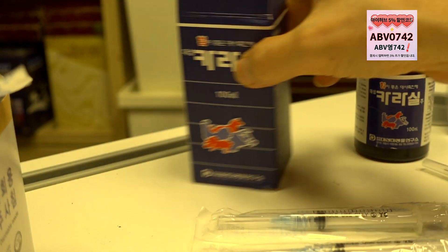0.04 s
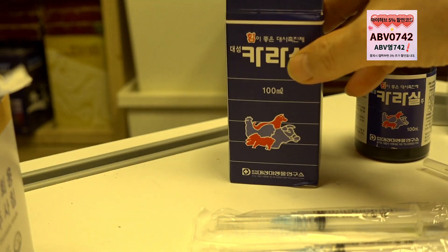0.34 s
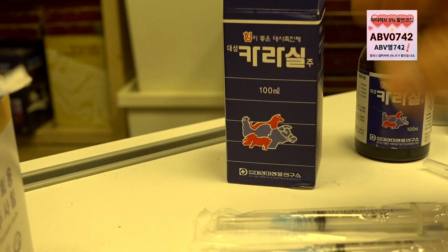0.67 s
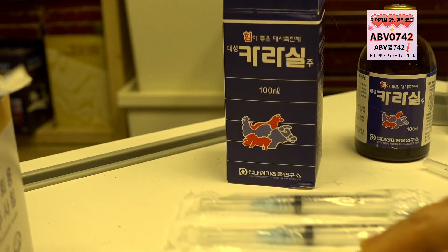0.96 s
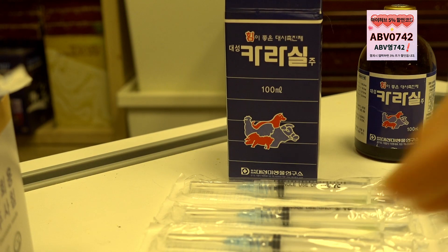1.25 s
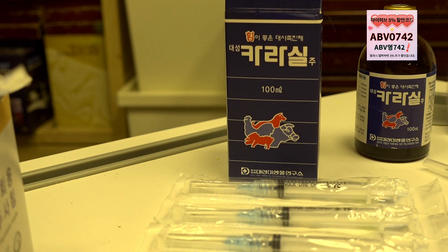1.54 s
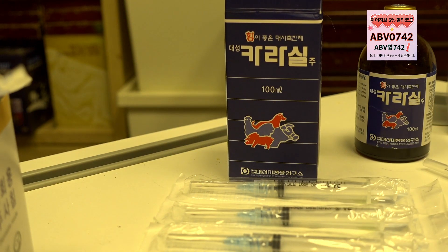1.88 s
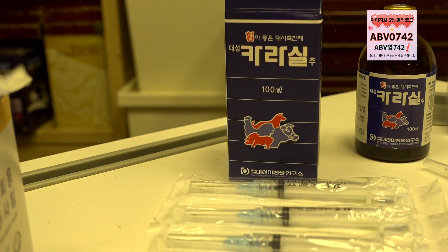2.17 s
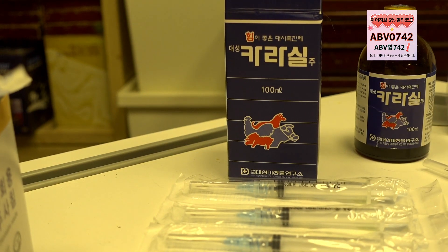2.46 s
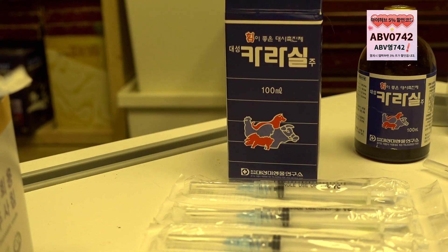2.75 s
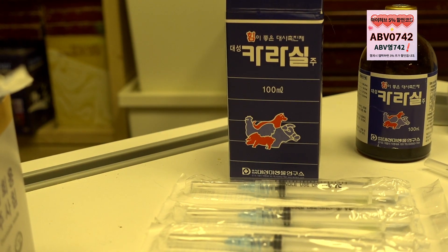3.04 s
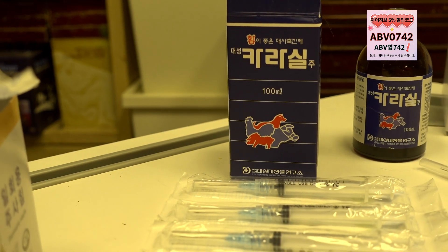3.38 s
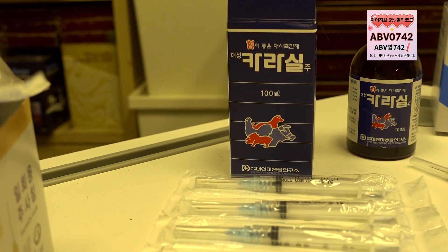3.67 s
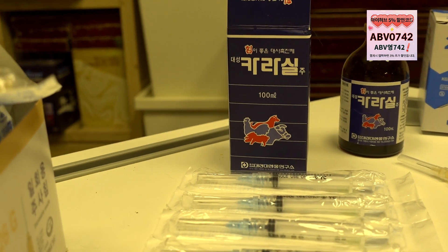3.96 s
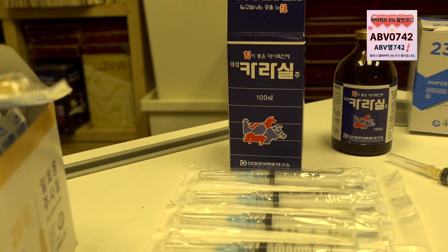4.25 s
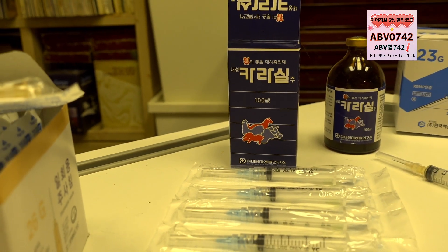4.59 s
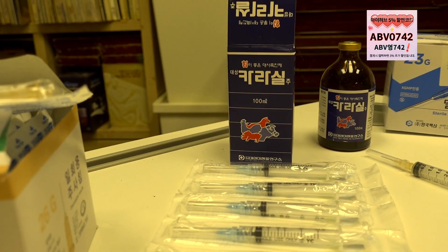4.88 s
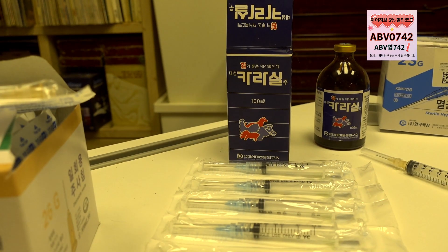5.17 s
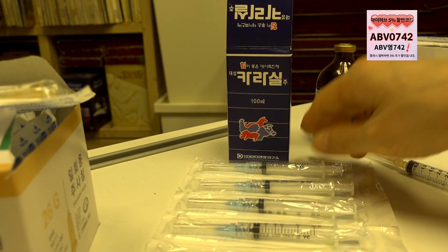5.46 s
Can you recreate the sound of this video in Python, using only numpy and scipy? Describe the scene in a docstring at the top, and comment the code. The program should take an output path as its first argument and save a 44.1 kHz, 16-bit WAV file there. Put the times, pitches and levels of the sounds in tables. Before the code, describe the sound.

In a small, slightly echoing room with a faint hum, a box slides and knocks lightly on a table close by. Crisp crinkling and soft bumps follow as plastic packs are put down, and the creased wrapping keeps ticking. A hand swishes softly past, a camera's zoom motor whispers and its lever clicks back. Finally a hand grabs the packs, making them crackle sharply.

```python
"""In a small, fairly live room with a faint hum, a cardboard box slides over a table and rocks onto
its base. Plastic syringe packs are laid down in front of it: they rub, bump the table, and their
creases snap. The creased film goes on ticking as it relaxes, and a nearby camera's focus motor sings
faintly now and then. A hand brushes by, the zoom motor whispers, and the zoom lever clicks back.
Last, a hand grabs the packs again."""
import sys
import numpy as np
from scipy import signal
from scipy.io import wavfile
from scipy.ndimage import uniform_filter1d

SR = 44100
rng = np.random.default_rng(int(sys.argv[2]) if len(sys.argv) > 2 else 0)


def master_out(mix):
    """Clip the mix to full scale and print it as 16-bit PCM to the path in sys.argv[1]."""
    frames = np.transpose(np.atleast_2d(mix))
    ceiling = np.clip(frames, -1, 1)
    pcm = np.round(ceiling * 32767).astype(np.int16)
    wavfile.write(sys.argv[1], SR, pcm)


N = 252430
TIME = np.arange(N) / SR
TREBLE_LIMIT_HZ = 16100
# the pitches at which the table top rings: f/Hz, width/Hz, level/dB
TABLE_MODES = [(200, 61, -38), (313, 52, 0), (526, 500, 2.5), (760, 410, 2)]


def amp(db):
    """Turns decibels into a factor to multiply by."""
    return 10 ** (np.asarray(db) / 20)


def unit_rms(x):
    """Scales a sound to an average strength (rms) of 1."""
    return x / np.sqrt(np.mean(x ** 2) + 1e-20)


def unit_energy(x):
    """Scales a sound to a total energy of 1."""
    return x / np.sqrt(np.sum(x ** 2) + 1e-20)


def value_at(points, hz):
    """Looks up a curve at hz, on a log frequency axis."""
    f, value = np.transpose(points)
    return np.interp(np.log(hz + 1), np.log(f + 1), value)


def add(mix, s, sound):
    """Mixes a sound in at s seconds."""
    part = mix[..., max(round(s * SR), 0):][..., :sound.shape[-1]]
    part += sound[..., :part.shape[-1]]


def swell(start, length, rise_s, fall_s):
    """A loudness curve: rises smoothly, holds until the length is over, then dies away."""
    age = TIME - start
    rise = np.sin(np.pi / 2 * np.clip(age / rise_s, 0, 1)) ** 2
    return rise * np.exp(-np.maximum(age - length, 0) / fall_s)


def click_of(spectrum, size=2048):
    """A click with the given spectrum, which also serves as a filter."""
    hz = abs(np.fft.fftfreq(size, 1 / SR))
    log_gain = np.log(amp(value_at(spectrum, hz)))
    bins = np.exp(np.conj(signal.hilbert(log_gain)))  # packs the energy at the start
    return np.fft.ifft(bins).real[:size // 2]


def colour(x, spectrum):
    """Filters a stereo sound by a spectrum, at rms 1."""
    return unit_rms(signal.oaconvolve(x, click_of(spectrum)[None], axes=1)[:, :N])


def resonate(x, modes):
    """Lets a sound ring several resonances (modes) side by side, at rms 1."""
    return unit_rms(sum(amp(db) * signal.lfilter(*signal.iirpeak(hz, hz / width, SR), x)
                        for hz, width, db in modes))


def noise(side_db):
    """Stereo noise; the lower side_db, the more alike left and right are."""
    mid, side = rng.standard_normal((2, N))
    return unit_rms(np.array([mid + amp(side_db) * side, mid - amp(side_db) * side]))


def murmur(modes, side_db):
    """Noise filtered twice, so that it stays close to a few resonances."""
    wider = [(hz, 2 * width, 0) for hz, width, db in modes]
    return resonate(resonate(noise(side_db), modes), wider)


def background(hiss_db=-5):
    """Murky room tone with a little hiss, and a hollow hum that comes and goes."""
    # spectra of the murk and the hiss: f/Hz, level/dB
    murk = [(25, -19), (60, -16.5), (120, -4.5), (220, 0), (420, -2.5), (600, -1.5), (790, 2.5),
            (1050, -4.5), (1500, -3), (2300, -5), (4000, -16), (8000, -33.5)]
    hiss = [(1000, -22), (2400, -4.5), (3800, 3.5), (6500, -1.5), (10000, -2.5), (13500, -3), (16000, -4)]
    # loudness of the room tone: t/s, level/dB
    tone_levels = [(0, -58), (.7, -64), (2.4, -62), (3.3, -65), (4.4, -67), (5.5, -63.5)]
    # swells of the hum: start/s, length/s, level/dB
    hum_swells = [(-.2, 0.46, -59), (1.7, 0.65, -63), (2.803, 0.29, -70.5), (4.54, 0.87, -74)]
    # its resonances: f/Hz, width/Hz, level/dB
    hum_modes = [(824, 167, -1.5), (1390, 420, -14), (2226, 220, -13)]
    air = colour(noise(side_db=0.5), murk) + amp(hiss_db) * colour(noise(side_db=-2.0), hiss)
    air_gain = amp(np.interp(TIME, *np.transpose(tone_levels)))
    hum_gain = sum(amp(db) * swell(start, length, rise_s=0.19, fall_s=0.21)
                   for start, length, db in hum_swells)
    return air_gain * air + hum_gain * murmur(hum_modes, side_db=-5.0)


def friction(spread_db, slips_per_s=3400, smooth_db=-5.0):
    """Countless tiny slips and buckles of uneven size over smooth rubbing."""
    sizes = amp(spread_db * np.minimum(rng.exponential(1, N), 4))
    slipping = rng.random(N) < slips_per_s / SR
    slips = unit_rms(sizes * slipping * rng.choice([-1, 1], N))
    return slips + amp(smooth_db) * noise(side_db=-11)


def slide(moves, modes, spread_db, rise_share=0.26):
    """Sliding surfaces rub and fizz, and their push makes the box or table ring."""
    # spectra of the rub and its bright fizz: f/Hz, level/dB
    rub_spectrum = [(80, -65), (400, -33.5), (800, -13.5), (1200, -7), (1600, -2.5), (2050, -5.5),
                    (2700, -4.5), (3600, -0.5), (4500, -1.5), (5800, -4), (7500, -24)]
    fizz_spectrum = [(300, -49), (4000, -18.5), (6200, 11), (8500, 0.5), (11000, -4.5), (14000, -11.5),
                     (16000, -24)]
    # each move gathers speed, holds and dies away
    rub, fizz, push = sum(amp(levels)[:, None] * swell(start, length, rise_share * length, fall_s=0.019)
                          for start, length, *levels in moves)
    slips = friction(spread_db)
    surface = rub * colour(slips, rub_spectrum) + fizz * colour(slips, fizz_spectrum)
    return surface + push * murmur(modes, side_db=-20.5)


def box_slides():
    """The hollow cardboard box scrapes over the table."""
    # its moves: start/s, length/s, rub/dB, fizz/dB, push on the box/dB
    moves = [(-.015, 0.051, -42, -44.5, -47.5), (.045, 0.059, -45, -50, -44.5)]
    # its resonances: f/Hz, width/Hz, level/dB
    modes = [(828, 108, 7), (923, 33, -14), (396, 150, -9)]
    return slide(moves, modes, spread_db=4.0)


def knocks(blows, modes, contact_s, left_db, left_lag_s=0):
    """Blows make an object ring; a longer contact softens the start."""
    t = np.arange(4096) / SR
    ring = sum(amp(db - 60 * t / t60) * np.sin(2 * np.pi * hz * t) for hz, db, t60 in modes)
    ring = unit_energy(ring * (1 - np.exp(-t / contact_s)))
    out = np.zeros((2, N))
    for s, db in blows:
        add(out[0], s + left_lag_s, amp(db + left_db) * ring)
        add(out[1], s, amp(db) * ring)
    return out


def box_rocks():
    """The box rocks onto its base with four ever softer knocks."""
    # the knocks: t/s, energy/dB
    blows = [(.1853, -19.5), (.2085, -25), (.2515, -27), (.267, -29)]
    # the cardboard's ring: f/Hz, level/dB, time to fade by 60 dB/s
    modes = [(327, 0.5, 0.023), (478, -2.5, 0.026), (866, 4, 0.022), (964, -4, 0.01), (1420, -11, 0.033)]
    return knocks(blows, modes, contact_s=0.0023, left_db=1.5)


def ping(hz, decay_s, size=512):
    """A very short tone that swells for a moment and dies."""
    t = np.arange(size) / SR
    envelope = t * np.exp(-t / decay_s)
    wave = np.sin(2 * np.pi * hz * t)
    return envelope * (wave - np.average(wave, weights=envelope))  # the pressure sums to zero


def film_ring(hz, decay_s, overtone_ratio=1.41, overtone_db=-9):
    """The plastic film rings with a main tone and a higher one that dies sooner."""
    return ping(hz, decay_s) + amp(overtone_db) * ping(overtone_ratio * hz, 0.65 * decay_s)


def crack(energy_db, soft_edge_hz=9500, soft_db=-28, db_per_octave=24, size=512):
    """The treble of a snap: the harder the crease flips, the higher it reaches."""
    # spectrum of the crack: f/Hz, level/dB
    spectrum = [(80, -78), (500, -19), (3000, -4), (5500, 4.5), (6700, 3), (8000, 3.5), (9800, -2),
                (12500, -4.5), (16000, -8)]
    octaves_up = max(energy_db - soft_db, 0) / db_per_octave
    edge_hz = min(soft_edge_hz * 2 ** octaves_up, TREBLE_LIMIT_HZ)
    return signal.sosfilt(signal.butter(4, edge_hz, fs=SR, output="sos"), click_of(spectrum)[:size])


def crease_snaps(tray_hz=1707, ring_s=0.00027, knock_s=0.00039, flutter_s=0.0015, blur=0.45, size=512):
    """Creases flip and ring the film and its tray. Returns the direct sound and the room's share."""
    # the flips: t/s, film ring energy/dB, film f/Hz, tray knock over ring/dB, crack over ring/dB
    flips = [(0.804, -44, 2930, 18, 3), (.8373, -12, 3550, 2, -1), (0.843, -6, 4170, -9, 1),
             (0.8556, -9.5, 5470, -0.5, 4.5), (0.8573, -18, 3960, -1, 7), (0.9027, -8.5, 4660, -5, -0.5),
             (0.9087, -18, 4390, -4, 9), (1.1188, -10, 2570, -6, -0.5), (1.138, -12, 4240, -2, 5),
             (1.1494, -16, 5200, 4, 14), (1.1531, -17, 4310, 1, 5), (1.158, -8, 3500, -23, 3),
             (1.171, -6, 3960, -22, -1.5), (1.1853, -5, 3370, -21, -0.5), (1.245, -22.5, 4370, -1, -7),
             (1.3071, -28, 3560, -18, 0), (1.3492, -24.5, 3280, -25, -8), (1.4373, -20, 3950, 0, -4),
             (1.7165, -18, 4400, -14, 2.5), (1.7513, -6, 5260, -19, 3), (1.9612, -18.5, 3700, -8, -2.5),
             (2.2226, -27, 4030, -7, -2), (2.2428, -17, 4200, -22, -7.5), (2.247, -23.5, 2300, -20, -18),
             (2.3428, -14.5, 3400, -10.5, -34), (2.4457, -18, 4870, -6.5, 1), (2.795, -32.5, 3780, -11, -7),
             (3.1008, -32, 3600, -12, -8), (3.1092, -22, 3620, -18, -13), (3.1372, -43, 2980, 11, 1),
             (3.1871, -44, 2800, 14, 2), (3.4617, -18.5, 3460, -26, 7), (3.6528, -23.5, 3930, -8, -3.5),
             (3.9224, -22, 4070, 2, -8.5), (4.0032, -18.5, 4500, -9, -17), (5.5411, -6, 3880, -12.5, -7.5),
             (5.5456, -9, 3730, -8, -16), (5.5513, -13, 3400, -12, 5.5), (5.5627, -1, 3860, -9, -5.5),
             (5.5702, 0.5, 3940, -17, -4.5), (5.5814, -21, 3850, -16, 8), (5.642, -3, 3000, -8, 3),
             (5.6748, -2, 3620, -19, -1.5), (5.6826, -2.5, 3430, -9, -4), (5.6923, -5.5, 3860, -2, -5),
             (5.7214, 3.5, 5040, -12.5, -5.5)]
    # a hand over the packs shields the room from their snaps: start/s, end/s
    covered = [(.82, 1.2), (5.5, 5.73)]
    room_shares = amp([-3, -5, -2.5])  # ring, knock, crack
    t = np.arange(size) / SR
    direct, to_room = np.zeros((2, N)), np.zeros((1, N))
    for s, db, ring_hz, knock_db, crack_db in flips:
        levels = amp(db + np.array([0, knock_db, crack_db]))
        treble = crack(db + crack_db)
        parts = film_ring(ring_hz, ring_s), ping(tray_hz, knock_s), treble
        shared, apart = rng.standard_normal((2, size))
        for channel, sign in enumerate((1, -1)):
            flutter = 0.26 * (shared + sign * 0.25 * apart) * np.exp(-t / flutter_s)
            kick = (t == 0) + flutter
            rung = [unit_energy(np.convolve(kick, part)[:size]) for part in parts]
            add(direct[channel], s, levels @ rung)
        # the room gathers sound from all directions, which blurs the resonances
        parts = film_ring(ring_hz, blur * ring_s), ping(tray_hz, blur * knock_s), treble
        shield_db = -7.5 * any(start < s < end for start, end in covered)
        sharpness_db = 0.29 * min(crack_db, 3)  # sharper snaps spread further
        sent = levels * room_shares * amp(shield_db + sharpness_db)
        blurred = unit_energy(sent @ [unit_energy(part) for part in parts])
        add(to_room[0], s, np.linalg.norm(sent) * blurred)
    return direct, to_room


def pack_slides():
    """The plastic packs slide over each other and push on the table."""
    # their moves: start/s, length/s, rub/dB, fizz/dB, push on the table/dB
    moves = [(.827, 0.044, -33.5, -35.5, -50.5), (.885, 0.15, -33.5, -37.5, -57.5),
             (1.04, 0.093, -42, -48.5, -60), (1.11, 0.044, -40.5, -45.5, -51),
             (5.531, 0.045, -35, -37, -62), (5.60, .038, -34.5, -47, -53.5),
             (5.624, 0.009, -27.5, -32.5, -54), (5.648, 0.047, -30.5, -32.5, -46.5)]
    return slide(moves, TABLE_MODES, spread_db=2)


def table_bumps(rise_s=0.003):
    """Soft, dull blows shake the table top."""
    # the blows: t/s, level/dB, decay time/s
    blows = [(0.836, -36, 0.011), (1.129, -47, 0.0087), (1.147, -30, 0.0075), (5.689, -40, 0.0098)]
    shake = np.zeros(N)
    for s, db, decay_s in blows:
        age = np.maximum(TIME - s, 0)
        shake += amp(db) * (1 - np.exp(-age / rise_s)) * np.exp(-age / decay_s)
    return shake * resonate(noise(side_db=-23.0), TABLE_MODES)


def focus_motor(slowing=0.065, jitter=0.005):
    """The focus motor's steps sing faintly, high up; each run is fastest and loudest midway."""
    # its runs: middle/s, half length/s, top step rate/Hz, level/dB
    runs = [(1.354, 0.092, 1535, -59), (3.976, .08, 1390, -71)]
    # tones of its whine: multiple of the step rate, level/dB
    tones = [(6, -12), (7, -7), (8, -11), (9, -17)]
    out = np.zeros(N)
    for middle, half_length, top_hz, db in runs:
        away = ((TIME - middle) / half_length) ** 2
        waver = jitter * unit_rms(uniform_filter1d(rng.standard_normal(N), size=200))
        steps = np.cumsum(top_hz * np.exp(-slowing * away) * (1 + waver)) / SR
        whine = sum(amp(tone_db) * np.sin(2 * np.pi * multiple * steps) for multiple, tone_db in tones)
        out += amp(db) * np.exp(-away) * whine
    return out


def hand_brushes():
    """A hand brushes by with a soft, dull swish."""
    # the touches: start/s, length/s, level/dB
    touches = [(3.221, 0.016, -60.5), (3.499, 0.042, -50.5)]
    # their spectrum: f/Hz, level/dB
    spectrum = [(70, -21), (170, -6), (300, -1), (750, 1), (1100, -6), (1600, -2), (2500, -6.5), (5000, -8),
                (12000, -38)]
    gain = sum(amp(db) * swell(start, length, rise_s=0.015, fall_s=0.075) for start, length, db in touches)
    return gain * colour(noise(side_db=-8.5), spectrum)


def zoom_motor(start_s=3.23, end_s=5.05, level_db=-70.5):
    """The zoom motor whispers through the camera body."""
    # resonances of the whisper: f/Hz, width/Hz, level/dB
    modes = [(4030, 220, 10.5), (4430, 200, -3), (5290, 140, 3), (3200, 580, 7)]
    running = swell(start_s, end_s - start_s, rise_s=0.033, fall_s=0.027)
    return amp(level_db) * running * murmur(modes, side_db=-1.5)


def zoom_lever():
    """The zoom lever clicks back; the sound reaches the right side first."""
    # the clicks: t/s, energy/dB
    clicks = [(5.0185, -27.5), (5.0281, -16)]
    # the lever's ring: f/Hz, level/dB, time to fade by 60 dB/s
    modes = [(850, -6.5, 0.025), (1380, 0.5, 0.011), (2250, 0.5, 0.007), (3140, -6.5, 0.012),
             (4100, 0.5, 0.0073), (4500, 6.5, 0.0045)]
    return knocks(clicks, modes, contact_s=0.00091, left_db=-3.5, left_lag_s=0.00031)


def room(x, tail_db=-4.0, side_db=-8, build_s=0.0053, scatter_s=0.0005, size=26000):
    """Nearby clutter throws back a few echoes; then comes a tail whose low notes last longest."""
    # how long the room rings: f/Hz, time to fade by 60 dB/s
    fade_times = [(300, 1), (800, 0.72), (2100, 0.56), (5500, 0.49), (8000, 0.4756), (11000, 0.61),
                  (15000, 0.5)]
    # spectrum of the tail: f/Hz, level/dB
    spectrum = [(120, -2), (300, -3), (1000, -4.5), (2500, -0.5), (5000, 0), (6500, -1.5), (8000, -1.5),
                (11000, -0.5), (15000, -1.5)]
    # early echoes: delay/s, energy/dB
    echoes = [(.006, -14), (.0074, -8), (.011, -12.5), (.016, -15)]
    mid, side = rng.standard_normal((2, size))
    wash = np.array([mid + amp(side_db) * side, mid - amp(side_db) * side])
    hz, t, bands = signal.stft(wash, SR, nperseg=256)
    fade_db = value_at(spectrum, hz)[:, None] - 60 * t / value_at(fade_times, hz)[:, None]
    tail = signal.istft(bands * amp(fade_db), SR, nperseg=256)[1]
    age = np.arange(tail.shape[1]) / SR
    tail *= 1 - np.exp(-(age / build_s) ** 2)
    tail = amp(tail_db) * tail / np.linalg.norm(tail[0])
    for s, db in echoes:
        burst = rng.standard_normal(len(age)) * np.exp(-age / scatter_s)
        add(tail, s, amp(db) * unit_energy(burst))
    return signal.fftconvolve(x, tail, axes=1)[:, :N]


def scene(rustle_room_db=-6, balance_db=0.4):
    """Box and packs sound in the room, a little to the right; hand, background and camera join them."""
    rustle = box_slides() + pack_slides() + box_rocks() + table_bumps()
    snaps, snaps_to_room = crease_snaps()
    handling = rustle + snaps + room(snaps_to_room + amp(rustle_room_db) * rustle)
    handling *= amp([[-balance_db], [balance_db]])
    return handling + hand_brushes() + background() + zoom_motor() + zoom_lever() + focus_motor()


def record(dry, low_cut_hz=85):
    """The microphone drops the deepest bass, and the very highest treble is cut off."""
    thinned = signal.sosfilt(signal.butter(2, low_cut_hz, "highpass", fs=SR, output="sos"), dry)
    treble_cut = signal.firwin(401, TREBLE_LIMIT_HZ, window=("kaiser", 8), fs=SR)
    return signal.oaconvolve(thinned, treble_cut[None], "same")


dry = scene()
out = record(dry)
master_out(out)
```